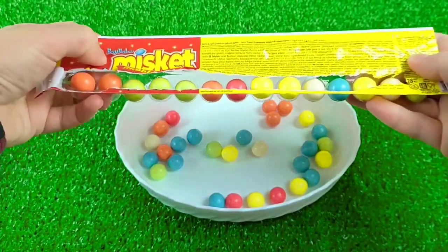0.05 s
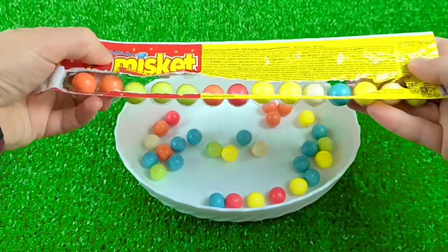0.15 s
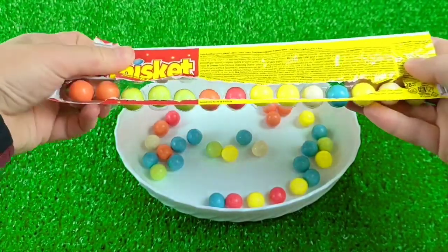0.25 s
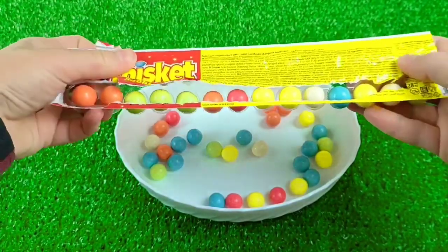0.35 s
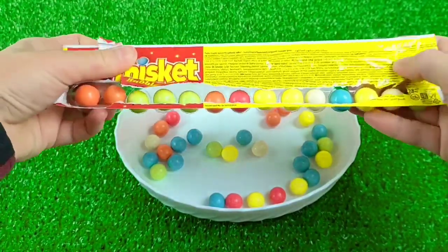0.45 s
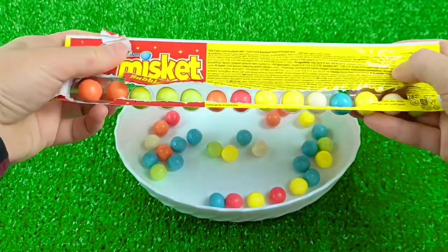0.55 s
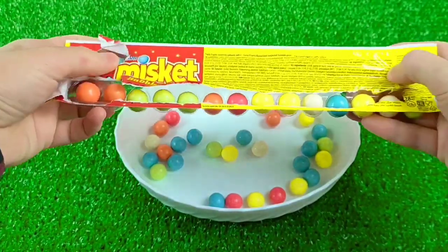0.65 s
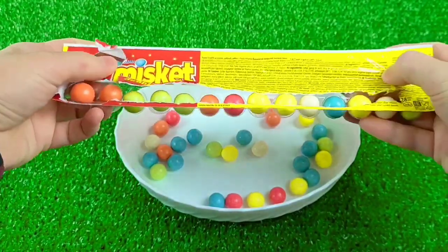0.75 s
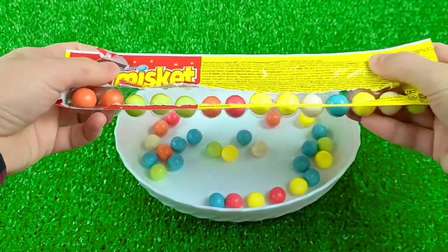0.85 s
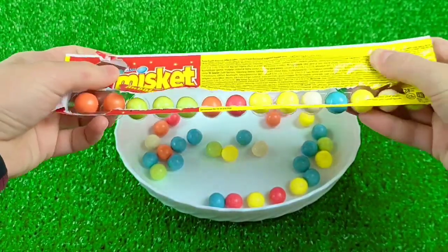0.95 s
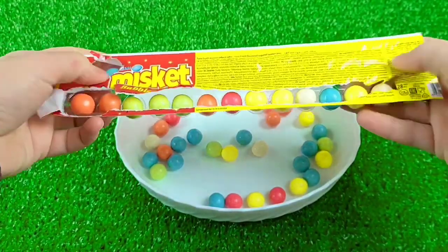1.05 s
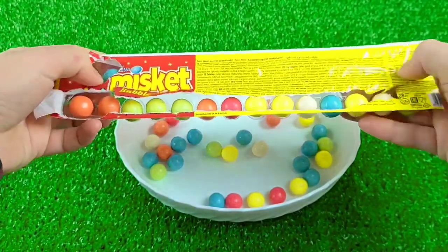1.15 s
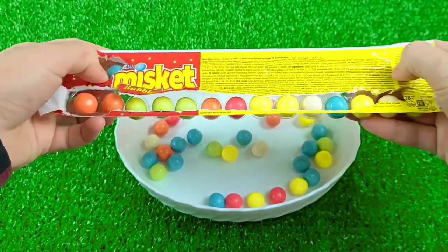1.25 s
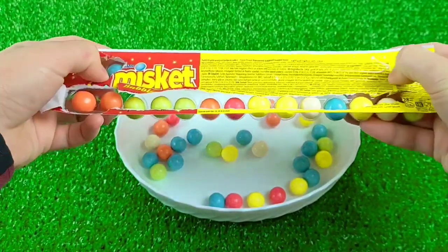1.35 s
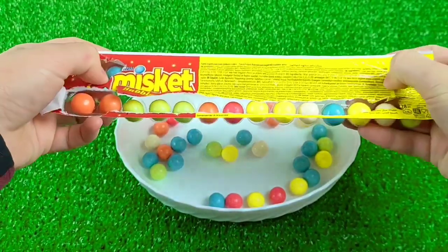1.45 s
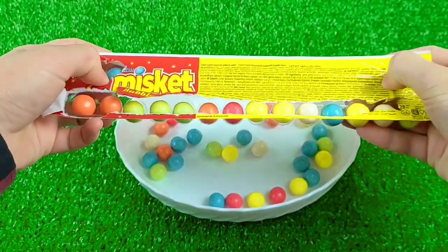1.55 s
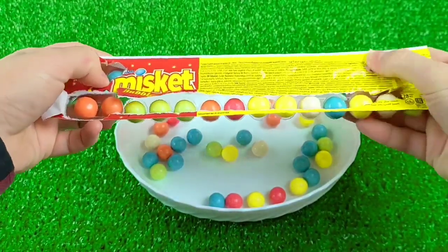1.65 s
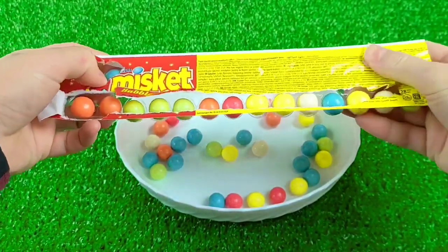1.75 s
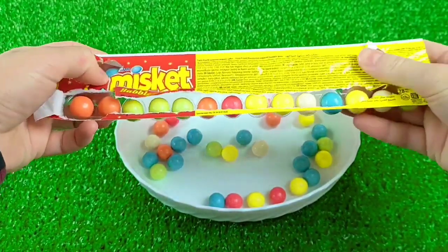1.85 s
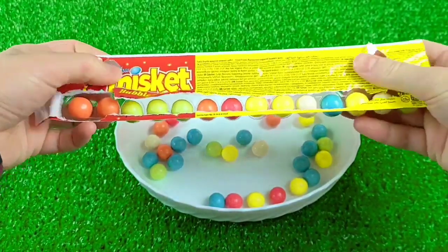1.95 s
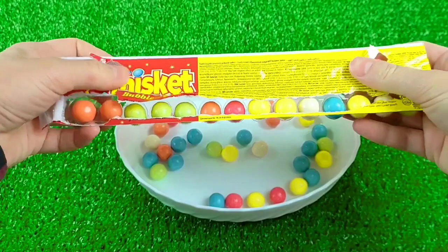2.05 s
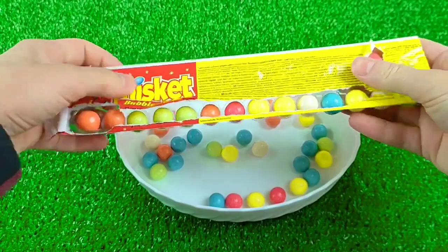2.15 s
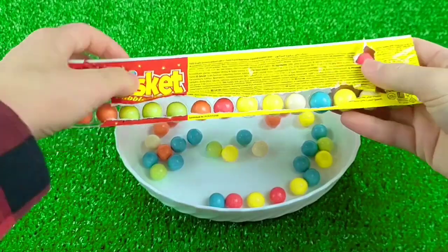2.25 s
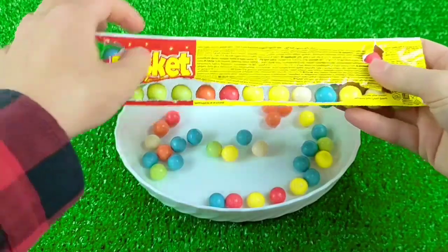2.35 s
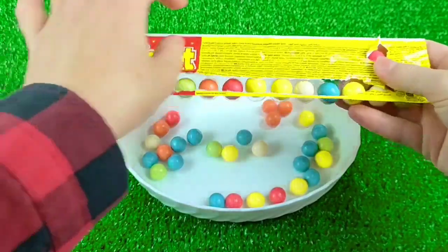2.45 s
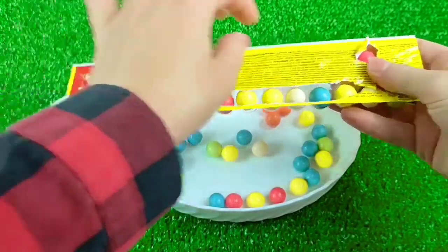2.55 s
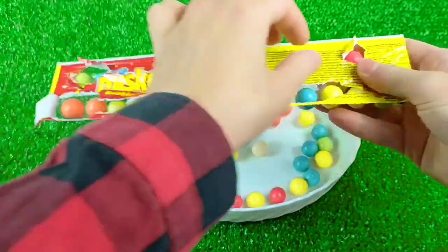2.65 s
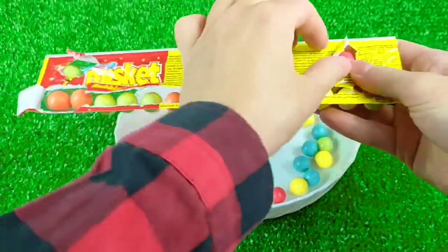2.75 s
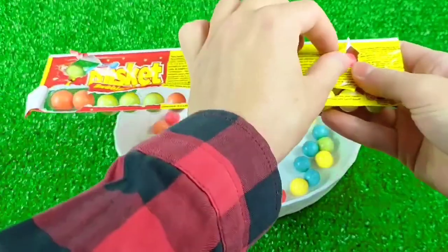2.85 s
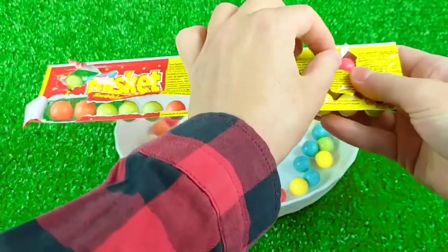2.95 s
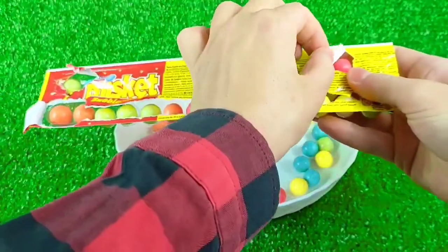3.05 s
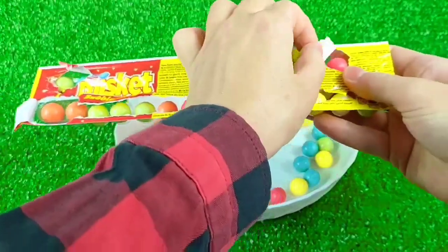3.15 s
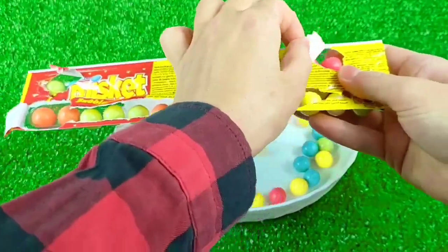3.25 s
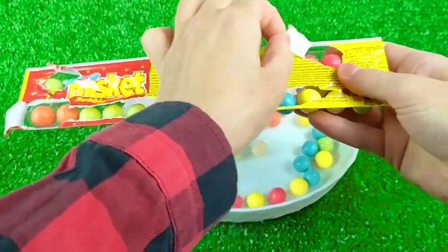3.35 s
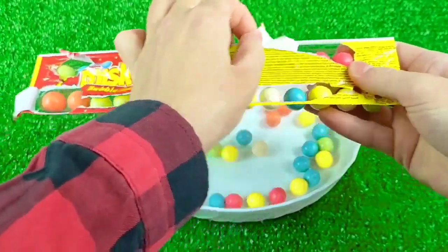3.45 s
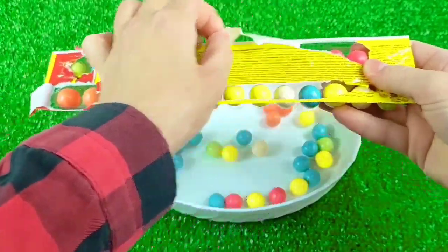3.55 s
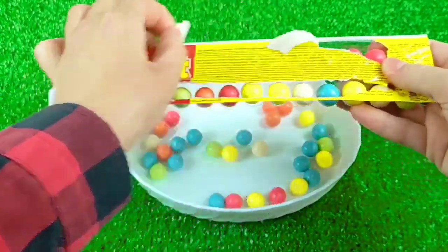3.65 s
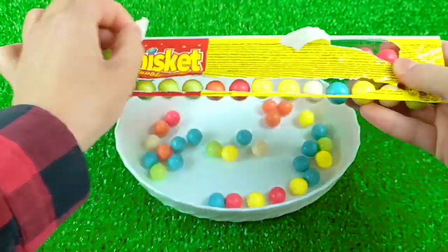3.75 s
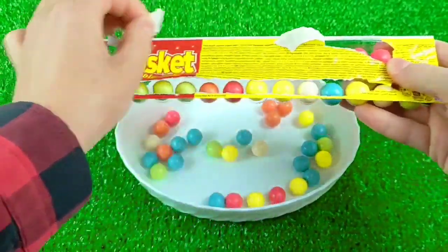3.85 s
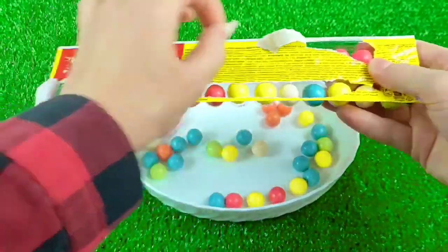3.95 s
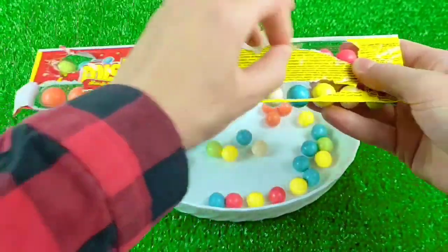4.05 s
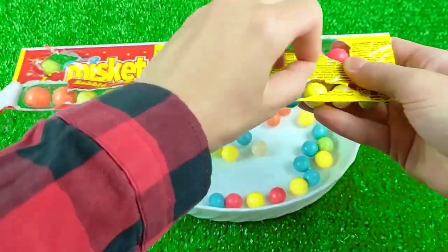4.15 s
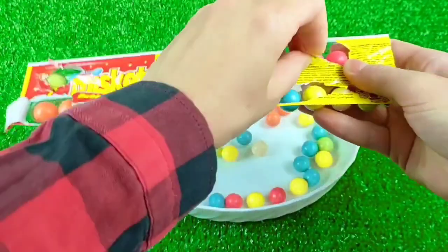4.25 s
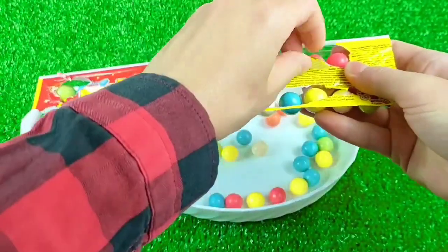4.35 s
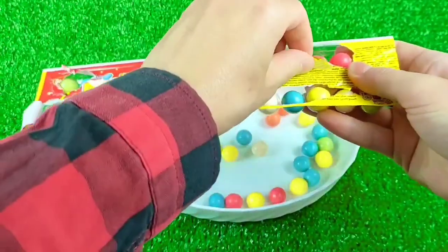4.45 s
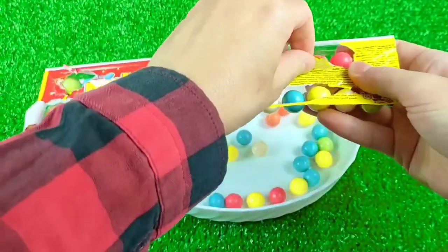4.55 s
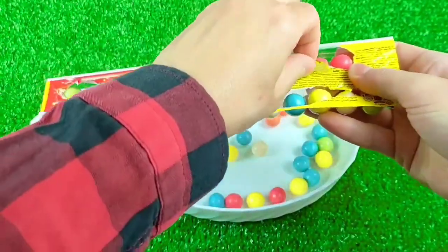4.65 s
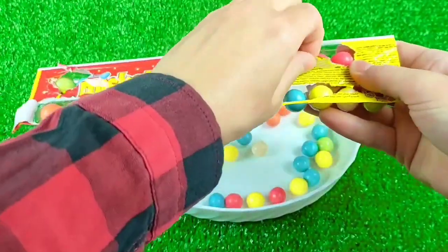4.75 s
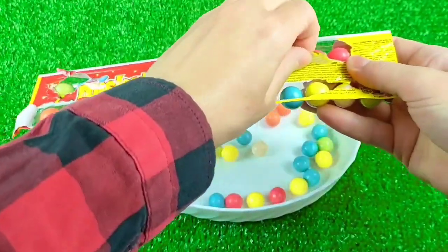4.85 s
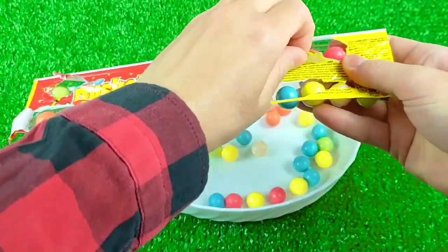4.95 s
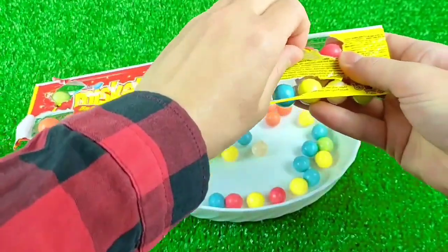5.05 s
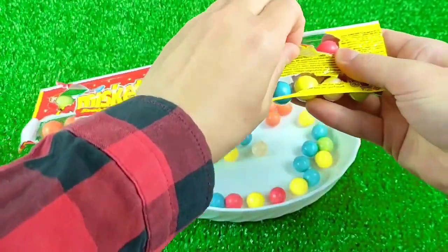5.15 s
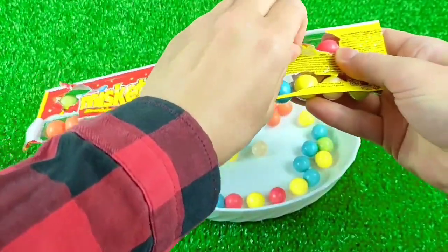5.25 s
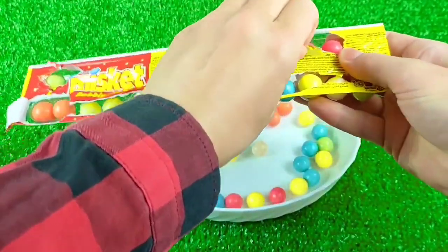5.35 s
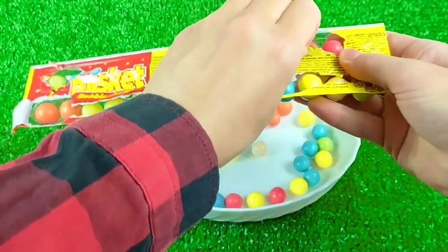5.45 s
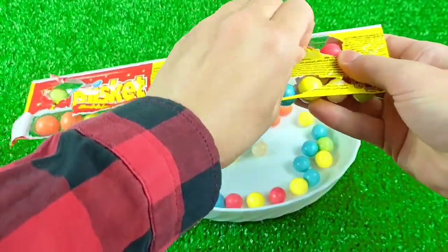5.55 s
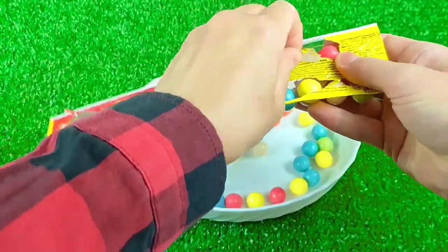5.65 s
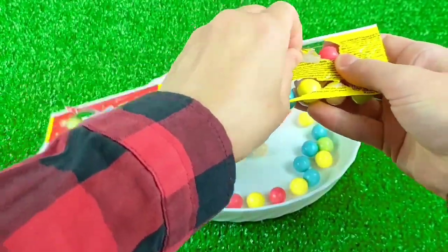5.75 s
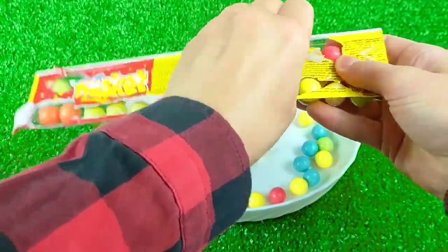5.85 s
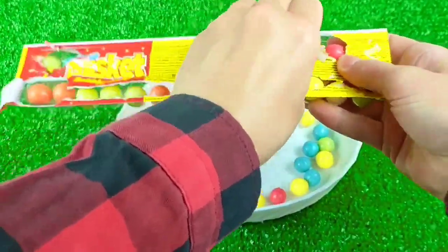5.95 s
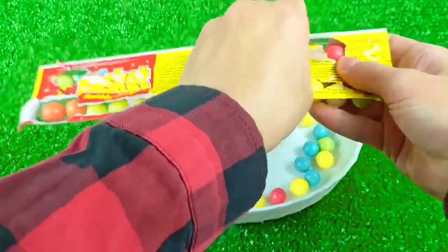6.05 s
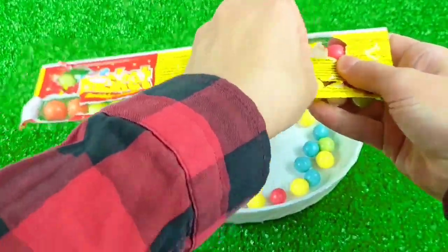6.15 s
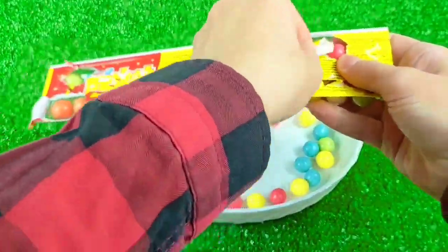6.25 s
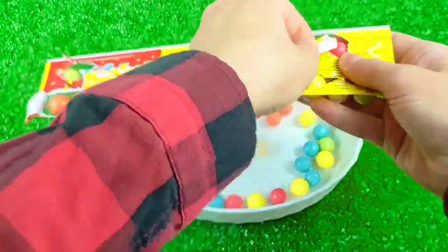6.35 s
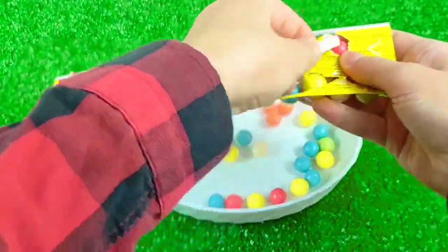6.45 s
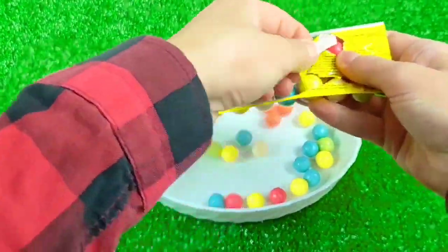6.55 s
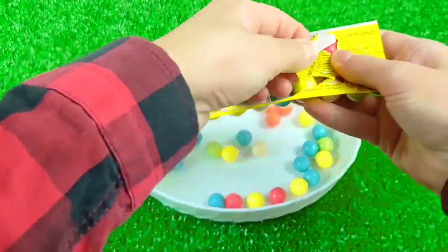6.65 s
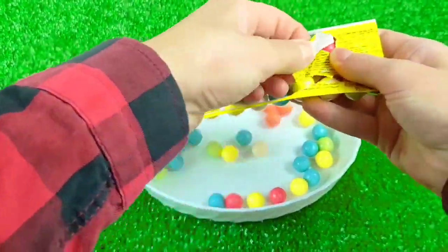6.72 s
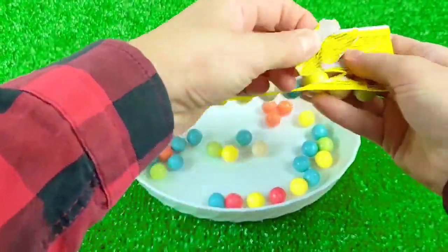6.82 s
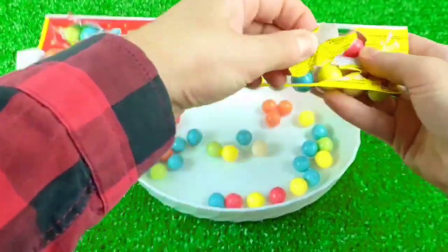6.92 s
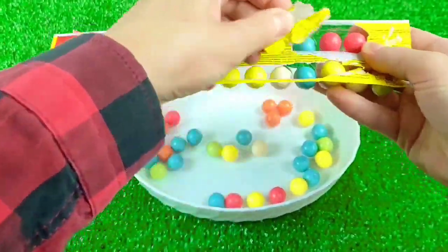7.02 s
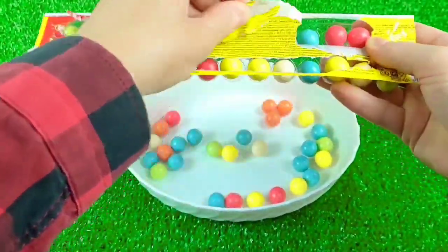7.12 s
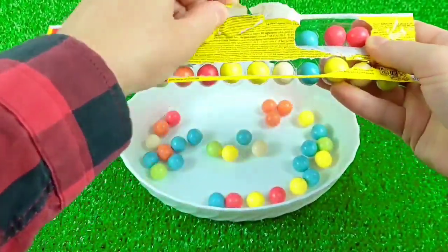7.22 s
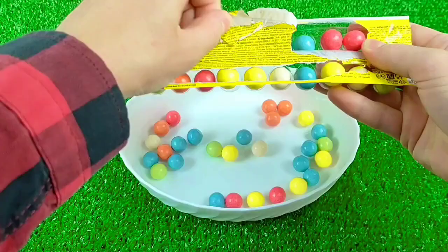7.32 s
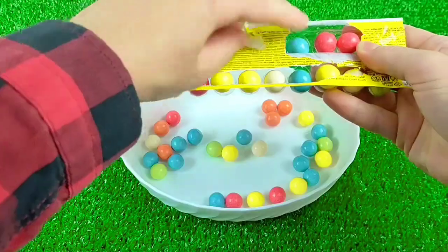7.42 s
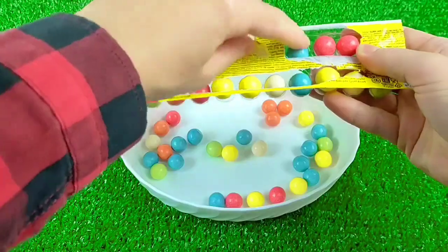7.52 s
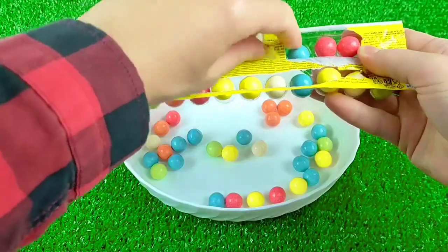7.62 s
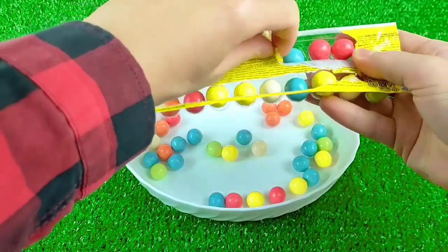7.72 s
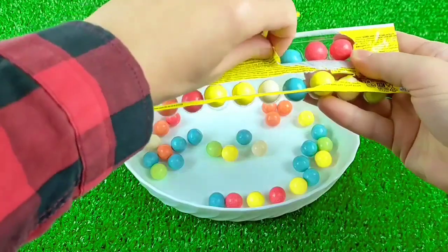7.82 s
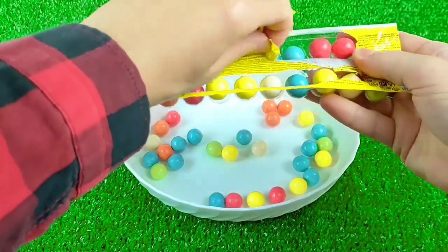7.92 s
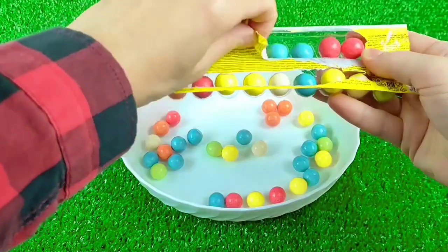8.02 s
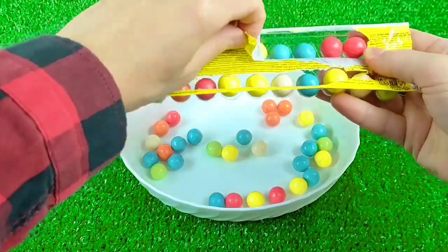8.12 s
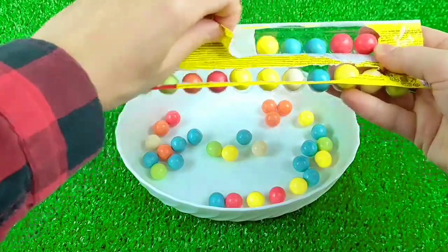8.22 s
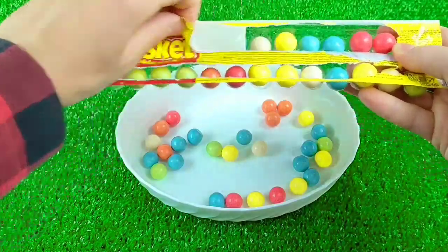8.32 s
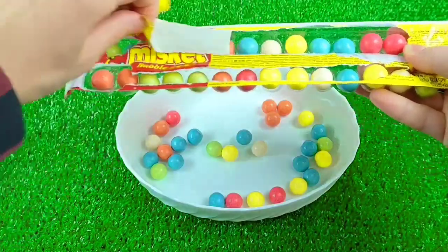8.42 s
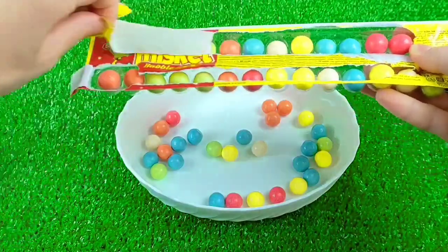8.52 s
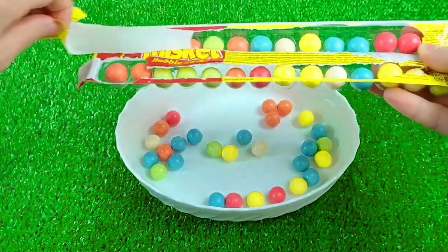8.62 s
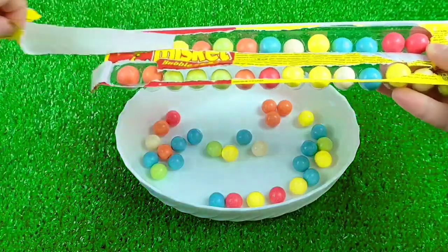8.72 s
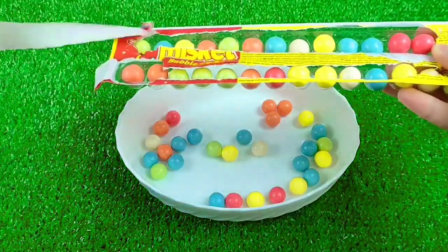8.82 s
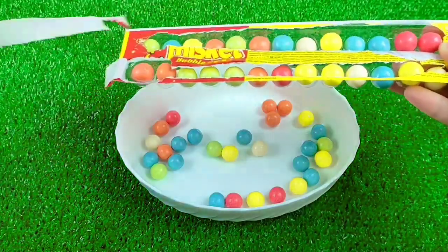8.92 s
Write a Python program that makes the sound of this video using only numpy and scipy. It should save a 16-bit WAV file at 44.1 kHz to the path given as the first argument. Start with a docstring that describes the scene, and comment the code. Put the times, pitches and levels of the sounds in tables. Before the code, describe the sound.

Bright, dry crinkling and irregular hard snaps of card and clear film, recorded close in stereo with little room sound. Quick tears and soft sleeve brushes mix in early; a drawn-out rip is followed by near quiet. Handling resumes with denser crackle, bursts loudly, and finishes with continuous paper peeling from glue over a faint hush.

```python
"""Hands flex a card-backed blister pack of candy balls; creases snap, and short pulls tear its paper
backing at 0.3 s. A faint tink follows at 0.49 s, more snaps, and longer pulls from 3.2 to 3.7 s.
After a lull, flexing and snaps thicken from 4.4 s, with a peak near 7 s; a long peel closes from 8.3 s.
Tearing and crinkling are dense ringing grains, snaps are noise bursts through facet resonances, and
sleeve brushes are shaped noise, all heard by two close ports in a small, quiet room."""
import sys
import numpy as np
from scipy import signal
from scipy.fft import rfft, irfft
from scipy.io import wavfile
from scipy.ndimage import uniform_filter1d, map_coordinates

SR = 44100
rng = np.random.default_rng(int(sys.argv[2]) if len(sys.argv) > 2 else 0)


def wav_out(sig):
    """Save sig, one row per channel (or a flat mono array), as 16-bit PCM at SR to the path in sys.argv[1]."""
    wavfile.write(sys.argv[1], SR, np.round(np.clip(np.atleast_2d(sig).T, -1, 1) * 32767).astype(np.int16))


N = 396018
TIME = np.arange(N) / SR

# colour of the pack's body: (frequency [Hz], level per Hz [dB])
PACK_COLOUR = [(120, -57), (400, -31.5), (750, -7), (1080, 2.5), (1500, -3.5), (2300, -0.5), (3300, 1),
               (4200, 3.5), (5100, 0), (6300, -2.5), (11000, -43)]
# colour of its finest, crispest crackle: (frequency [Hz], level per Hz [dB])
CRISP_COLOUR = [(1500, -50), (5000, -17), (7600, 2), (10000, 1), (13700, -3), (16000, -11)]
JERK_RATE = 45  # new courses per second, for the jerking glue and the sway of the strip's pitch


def undb(db):
    """Decibels to gain."""
    return 10 ** (np.asarray(db) / 20)


def unit(x):
    """Scale to rms 1."""
    return x / np.sqrt(np.mean(x ** 2))


def colour(x, points):
    """Causal minimum-phase filter with a spectrum of (Hz, dB) points, by way of the cepstrum."""
    hz, db = np.transpose(points)
    size = 4096
    bin_hz = np.arange(size // 2 + 1) * SR / size
    gain = undb(np.interp(np.log(bin_hz + 1), np.log(hz), db))
    cepstrum = irfft(np.log(gain))[:size // 2]
    cepstrum[0] /= 2
    response = irfft(np.exp(rfft(2 * cepstrum, size)))
    return signal.oaconvolve(x, response[None], axes=1)[:, :x.shape[1]]


def resonate(x, hz, q):
    """One resonance, gain 1 at its centre; the centre stays at or below SR / 4 and q at or above 0.6."""
    b, a = signal.iirpeak(min(hz, SR / 4), max(q, .6), fs=SR)
    return signal.lfilter(b, a, x)


def add(out, s, sound):
    """Mix a stereo sound in at time s."""
    i = int(s * SR)
    out[:, i:i + sound.shape[1]] += sound[:, :N - i]


def hiss():
    """Unrelated white noise at the two ports."""
    return rng.standard_normal((2, N))


def walk(rate):
    """Smooth chance with a spread near 1, taking a new course at the given rate a second."""
    step = int(SR / rate)
    courses = np.repeat(rng.standard_normal(N // step + 1), step)
    return uniform_filter1d(courses, step)[:N]


def stroke(s, rise_s, hold_s, fall_s):
    """Envelope of one hand movement: a straight rise, a hold and an exponential fall."""
    envelope = np.zeros(N)
    start, end = int(s * SR), int((s + rise_s + hold_s + 10 * fall_s) * SR)
    span = slice(max(start, 0), end)
    t = TIME[span] - s
    fall = np.exp(-np.maximum(t - rise_s - hold_s, 0) / fall_s)
    envelope[span] = np.clip(t / rise_s, 0, 1) * fall
    return envelope


def peeling():
    """Paper pulled off its glue: dense tearing, coarser rips of fibre clumps and a fine fibre hiss."""
    # pulls: (start [s], end [s], rise [s], fall [s], level [dB], crispness: film against card [dB])
    peels = [(0.294, 0.368, 0.038, 0.023, -17, -10.5), (0.383, 0.418, 0.039, 0.037, -17.5, -30),
             (1.78, 1.804, 0.028, 0.018, -11, -6), (3.19, 3.314, 0.12, 0.12, -23.5, -6.5),
             (3.423, 3.73, 0.12, 0.013, -17.5, -10), (6.343, 6.449, 0.067, 0.022, -23.5, -4),
             (8.053, 8.15, 0.04, 0.088, -18, -9), (8.294, 9.0, 0.036, .05, -17.5, -9.5)]
    # resonances of the taut strip: (frequency [Hz], sharpness q, mean level against the tear [dB])
    strip = [(940, 0.61, -12.5), (2560, 5, 1), (5860, 12, -14), (11700, 3.75, 15.5)]
    # colour of the finest parting fibres: (frequency [Hz], level per Hz [dB])
    fibre = [(6000, -33), (10500, -3), (14000, 10)]
    tension_db, tension_rate = 5, 9  # swell of the strip's resonances, new courses per second
    fibre_db, rip_db, jerk_db = -32, -2, 1.5  # hiss in any pull, rips against card tearing, jerk spread

    fractures = grains(rate=3600, spread_db=0.5, pitch_hz=4300, facet_db=15.0, q=31, wander_db=3.0)
    plain_tear = unit(bend(fractures))
    tear = plain_tear.copy()
    for hz, q, db in strip:
        tear += undb(db + tension_db * walk(tension_rate)) * resonate(plain_tear, hz, q)

    pulls = []
    for s, end, rise, fall, db, crisp in peels:
        pulls.append((stroke(s, rise, end - s - rise, fall), db, crisp))
    card, film = drive(pulls)
    # the fibre hiss is as loud in a gentle pull as in a hard one
    pulling = sum(envelope for envelope, _, _ in pulls)
    fibres = unit(colour(hiss(), fibre)) * undb(fibre_db) * pulling
    coarse = press(rips(), card * undb(rip_db), size=SR // 10)
    # the glue holds and lets go in quick uneven jerks
    jerks = undb(jerk_db * walk(JERK_RATE))
    return (crackle(tear, (card, film), size=1800) + coarse + fibres) * jerks


def rips(rate=200, spread_db=4.5, ring_s=0.00033, sway=0.07):
    """Fibre clumps give way at uneven steps; each plucks the taut strip, which radiates little bass."""
    # pitch of the strip's ring as the glue slips, before its sway: (time [s], pitch [Hz])
    strip_ring = [(.35, 3100), (3.3, 2750), (3.55, 3800), (3.68, 4250), (3.72, 2900), (8.9, 4250)]
    chance = rng.random((int(rate * N / SR), 4)).T
    steps = np.cumsum(.25 + chance[0])
    when = (steps / steps[-1] * (N - 1)).astype(int)
    size = undb(-spread_db * np.log(1 - .95 * chance[1]))
    force = np.zeros((2, N), complex)
    force[:, when] = size * np.exp(2j * np.pi * chance[2:])  # own chance phase at each port
    t = np.arange(int(20 * ring_s * SR)) / SR
    pluck = t * np.exp(-t / ring_s)
    ringing = signal.oaconvolve(force, pluck[None], axes=1)[:, :N]
    hz = np.interp(TIME, *np.transpose(strip_ring)) * (1 + sway * walk(JERK_RATE))
    carrier = np.exp(2j * np.pi * np.cumsum(hz) / SR)
    return np.gradient((ringing * carrier).real, axis=1)  # the slope thins out the bass


def crinkling():
    """Flexing works many small facets into fine crinkling, with small creases ticking above it."""
    # finger flexes: (start [s], length [s], crackle level [dB], crispness: film against card [dB])
    flexes = [(0.0, 0.085, -27.5, -9.5), (0.103, 0.032, -18.5, -8), (0.587, 0.098, -23, -10.5),
              (0.693, 0.073, -20.5, -5.5), (0.93, 0.093, -19, -9), (1.11, 0.1, -31, -0.5),
              (1.17, 0.19, -35, -12), (1.365, 0.056, -22, -8.5), (1.506, 0.17, -30.5, -4),
              (1.849, 0.092, -35, -8.5), (1.999, 0.22, -34, -10.5), (2.314, 0.26, -31, -5),
              (2.57, 0.077, -22.5, -34), (2.878, 0.067, -37, -13), (2.982, 0.17, -32.5, -14),
              (3.735, 0.077, -32, -11.5), (3.863, 0.21, -39.5, -16), (4.316, 0.13, -29.5, -17),
              (4.483, 0.12, -31, -14), (4.744, 0.085, -33, -8), (4.869, 0.042, -23.5, -4.5),
              (5.093, 0.078, -23, -4.5), (5.257, 0.14, -41.5, 1), (5.359, 0.079, -28.5, -13),
              (5.486, 0.083, -24, -13), (5.802, 0.033, -27.5, -12), (5.994, 0.078, -28, -13),
              (6.101, 0.36, -33.5, -13), (6.483, 0.38, -28.5, -9.5), (6.568, 0.2, -27, -5.5),
              (6.723, 0.072, -17.5, -10.5), (6.91, 0.062, -22, -12.5), (7.027, 0.084, -23.5, -35),
              (7.128, 0.08, -20.5, -22), (7.304, 0.11, -30.5, -20), (7.55, 0.35, -38.5, -10),
              (7.863, 0.14, -24.5, -5.5)]
    ticks_db = -7  # ticks against the drive of the crinkling
    gains = drive((flex(s, length), db, crisp) for s, length, db, crisp in flexes)
    crinkle = bend(grains(rate=1300, spread_db=4.0, pitch_hz=3700, facet_db=13.5, q=4.8))
    ticks = grains(rate=80, spread_db=3.0, pitch_hz=4200, facet_db=20, q=5, wander_db=2,
                   scatter_db=-15, scatter_s=0.001, count=8)
    return crackle(crinkle, gains, size=1800) + undb(ticks_db) * crackle(ticks, gains, size=SR)


def flex(s, length_s, rise_s=0.017, fall_s=0.017, settle_db=-9.5, settle_s=0.12):
    """A flex builds quickly and dies away; the creases keep settling more faintly for longer."""
    hold_s = length_s - rise_s
    settling = undb(settle_db) * stroke(s, rise_s, hold_s, settle_s)
    return np.maximum(stroke(s, rise_s, hold_s, fall_s), settling)


def grains(rate, spread_db, pitch_hz, facet_db, q, wander_db=5, wander_rate=18,
           scatter_db=-11, scatter_s=0.004, count=12):
    """Tiny fractures at random times ring small facets, which take turns as the sheet bends."""
    t = np.arange(SR // 200) / SR
    out = np.zeros((2, N))
    for facet_hz in pitch_hz * 2 ** np.linspace(-1.35, 1, count):
        when, size, sign = rng.random((int(rate * N / SR / count), 3)).T
        hits = np.sign(sign - .5) * undb(-spread_db * np.log(1 - .98 * size))
        force = np.bincount((when * N).astype(int), hits, N)
        force *= undb(wander_db * walk(wander_rate))
        # the bending wave runs through the sheet and radiates again from its edges
        sheet = undb(scatter_db) * rng.standard_normal((2, len(t))) * np.exp(-t / scatter_s)
        sheet[:, 0] = 1
        sheet += undb(facet_db) * resonate(sheet, facet_hz, q)
        out += signal.oaconvolve(force[None], sheet, axes=1)[:, :N]
    return out


def bend(x, octaves=0.07, rate=7):
    """As the sheet bends, all its resonances glide up and down together, by a varying playback speed."""
    place = np.cumsum(2 ** (octaves * walk(rate)))
    return np.array([map_coordinates(port, [place], order=2, mode="mirror") for port in x])


def drive(strokes, grip_db=-59):
    """How hard card and film are worked by (envelope, level dB, crispness dB) strokes, summed in power."""
    card, film = undb(grip_db) ** 2, 0  # between strokes the fingers still hold the pack
    for envelope, db, crisp_db in strokes:
        power = (envelope * undb(db)) ** 2
        card = card + power
        film = film + power * undb(crisp_db) ** 2
    return np.sqrt(card), np.sqrt(film)


def crackle(fractures, gains, size):
    """Fractures sound through the card and through the crisp film."""
    card, film = gains
    through_card = press(colour(fractures, PACK_COLOUR), card, size)
    return through_card + press(colour(fractures, CRISP_COLOUR), film, size)


def press(x, gain, size):
    """The hands set a crackle's mean strength over size samples; single grains still stand out."""
    power = uniform_filter1d(np.mean(x ** 2, axis=0), size=size)
    return x * gain / np.sqrt(power + power.mean() / 1000)


def snaps(q=1.7, run_s=0.0016, lead_s=0.0006, usual_db=-13, growth=0.3, jerk=0.6,
          body_db=-10, neighbour_db=-6):
    """A crease snap: a noise burst with a very short swell, a jerk and settling slips, longer if big."""
    # creases, ahead of swing and room:
    # (time [s], level over 5 ms [dB], pitch of the buckling facet [Hz], treble against facet [dB])
    creases = [(0.0621,-16,4830,2),(0.1313,-13,3200,-11),(.3155,-13,4050,-10),(.353,-7,3360,-8),(0.4515,-8.5,6200,-8),(0.5694,-20,3500,-18),
               (0.6046,-12.5,3740,-16),(0.7178,-10.5,5100,-11),
               (0.736,-16,4900,1),(0.7824,-22,4400,-4),(0.792,-14.5,4200,-6),(0.8715,-13.5,4130,-9),(1.1206,-16.5,4100,-5.5),(1.1416,-14.5,4960,-13),
               (1.217,-8,6000,-13),(1.359,-15.5,2830,-12),(1.3838,-11,2900,-27),(1.4815,-21,3030,-16),
               (1.522,-9,5070,0),(1.542,-14,5260,0),(1.589,-8.5,3750,-1.5),
               (1.6606,-13.5,2750,-4),(1.779,-20,4000,-9),(1.9003,-21.5,3860,-13),(2.04,-20,3900,-13),(2.2392,-19.5,3100,-13),(2.2905,-8,5800,-9),
               (2.3217,-13.5,3420,-8),(2.3362,-15,4640,-7),(2.4393,-16.5,2680,-9),(2.452,-12,3300,-4.5),(2.5253,-9,3460,-8),
               (2.564,-2.5,3020,-12),(2.8066,-30,4500,-9),(2.9066,-23,3800,-14),(3.0095,-14,3800,-19),
               (3.092,-17,3370,-10),(3.4068,-20.5,4300,2),(3.5001,-15,3480,-16),(3.9995,-39,4200,-25),(4.0523,-28.5,3060,-20),(4.0867,-27.5,3360,-18),(4.419,-12.5,3460,-21),
               (4.4943,-12.5,2900,-16),(4.6665,-29,4100,-4),(4.7207,-22.5,5600,4),(4.776,-17.5,5040,-2),(4.806,-17,4000,-23),(4.8517,-7,2670,-5),(4.8699,-20,2120,-13),(4.9105,-14,5260,0),
               (4.953,-19.5,3930,-14),(5.0381,-20,4800,-9),(5.101,-15.5,4430,-23),(5.1512,-8.5,4300,-6),(5.2583,-18.5,3540,-12),(5.3192,-17.5,3230,-3),
               (5.3818,-14.5,4300,-1.5),(5.5016,-12,4730,-15),(5.519,-7.5,4830,-7.5),(5.5268,-11.5,4500,-5),(5.8189,-16,3600,4.5),
               (5.876,-13.5,5060,-13),(5.9898,-19.5,3780,-12),(6.012,-8.5,3160,-13),(6.062,-14,3960,-9),(6.512,-10.5,5440,-14),(6.8616,-16,3620,-25),(6.95,-7,4660,-5),(6.9595,-2,3500,-27),
               (7.2144,-16,3600,-11),(7.314,-20.5,3710,-8),(7.3842,-21,3440,-25),(7.5525,-12.5,3180,-13),(7.5997,-11.5,4040,-11),(7.629,-18,4630,-6),(7.665,-14,4700,-3.5),(7.729,-22.5,3930,-23),
               (7.7495,-24,3000,-16),(7.7916,-18,3880,-8),(7.836,-16,3420,-8),(7.849,-16,4670,-8),(7.883,-14,3060,-16),(7.9261,-15,3000,-13),(8.023,-14,5800,-5),(8.077,-21,3700,-9)]
    out = np.zeros((2, N))
    t = np.arange(-SR // 200, SR // 50) / SR  # 5 ms before the jerk to 20 ms after
    for s, db, hz, treble_db in creases:
        size = undb(growth * (db - usual_db))
        envelope = np.exp(-np.maximum(t / run_s, -t / lead_s) / size)
        slips = rng.standard_normal((2, len(t))) * envelope
        kick = (t == 0) * jerk / size * np.linalg.norm(slips[0])
        body = colour(slips + kick, PACK_COLOUR)
        sound = unit(resonate(body, hz, q)) + undb(body_db) * unit(body)
        # a neighbouring facet of chance size gives each snap its own colour
        neighbour_hz = hz * 2 ** rng.uniform(-.8, .6)
        sound += undb(neighbour_db) * unit(resonate(body, neighbour_hz, 12))
        sound += undb(treble_db) * unit(colour(slips, CRISP_COLOUR))
        sound[1] = np.roll(sound[1], rng.integers(-5, 5))  # samples between the ports
        add(out, s + t[0], unit(sound) * undb(db) / np.sqrt(5))  # 25 ms long, levelled as over 5 ms
    return out


def jolts(decay_s=0.009, knock_s=0.002, knock_db=11):
    """The loaded pack jerks in the fingers: a dull knock and a short low thud of decaying noise."""
    # jerks of the whole pack, ahead of the room: (time [s], peak level [dB])
    jerks = [(0.355, -19), (0.738, -18), (0.872, -23), (1.590, -20), (1.803, -25), (2.29, -18),
             (2.562, -17), (4.912, -20)]
    out = np.zeros((2, N))
    t = np.arange(SR // 10) / SR
    for s, db in jerks:
        decay = np.exp(-t / decay_s) + undb(knock_db) * np.exp(-t / knock_s)
        push = rng.standard_normal((2, len(t))) * decay
        thud = colour(push, [(30, -2.0), (600, 4), (4000, -52.0)])
        add(out, s, thud / np.abs(thud).max() * undb(db))
    return out


def brushing(rise_s=0.014, fall_s=0.057, uneven_db=2.5, uneven_rate=70):
    """Sleeve and palm slide over the card: a dull noise swish that catches and slips."""
    # brushes, before the unevenness: (start [s], length [s], level [dB])
    brushes = [(0.0, 0.035, -38.5), (0.111, 0.022, -33), (0.341, 0.12, -26), (0.933, 0.053, -28.5),
               (1.228, 0.073, -38.5), (1.365, 0.041, -35.5), (1.783, 0.02, -32.5), (2.373, 0.048, -39),
               (2.55, 0.063, -23.5), (3.277, 0.17, -48.5), (3.518, 0.22, -39.5), (3.803, 0.22, -48.5),
               (4.324, 0.12, -37.5), (4.84, 0.033, -38), (5.995, 0.076, -33.5), (6.955, 0.16, -41),
               (7.043, 0.12, -35.5), (7.138, 0.037, -26), (7.327, 0.055, -35), (7.928, 0.29, -43),
               (8.105, 0.11, -38.5), (8.285, 0.98, -36.5)]
    # colour of the swish: (frequency [Hz], level per Hz [dB])
    cloth = [(80, -21), (250, -2.5), (420, 8.5), (950, -4), (1600, -16)]
    power = 0
    for s, length, db in brushes:
        power = power + (undb(db) * stroke(s, rise_s, length - rise_s, fall_s)) ** 2
    swish = unit(colour(hiss(), cloth))
    return swish * np.sqrt(power) * undb(uneven_db * walk(uneven_rate))


def tink(start_s=0.49):
    """Something hard tinks faintly: two high modes ring out briefly."""
    # modes: (frequency [Hz], starting level [dB], 60 dB decay time [s])
    modes = [(6500, -26, 0.16), (6850, -26, 0.058)]
    t = np.maximum(TIME - start_s, 0)
    return sum(undb(db - 60 * t / t60) * np.sin(2 * np.pi * hz * t) for hz, db, t60 in modes)


def swing(x, card_hz=1030, q=0.67):
    """Slack card radiates its low mids; pinched tight it sounds thin."""
    # how freely the card swings between the fingers: (time [s], low-mid emphasis [dB])
    slack = [(0.8, 1), (1.8, 7.5), (2.6, 3), (3.3, 9.5), (4.6, 6), (6.1, 3), (6.4, -2.5), (6.85, -8.5),
             (7.2, 4.5), (7.9, 5.5), (8.15, 11), (8.45, 4)]
    emphasis = undb(np.interp(TIME, *np.transpose(slack)))
    return x + (emphasis - 1) * resonate(x, card_hz, q)


def bowl(x, path_m=0.37, drift_m=0.061, drift_rate=2.5, echo_db=-9.5):
    """A bowl wall below sends each port one early reflection; its comb shifts as the hands move."""
    echo = []
    for port in x:
        delay_s = (path_m + drift_m * walk(drift_rate)) / 343  # extra path over the speed of sound
        echo.append(map_coordinates(port, [(TIME - delay_s) * SR], order=3))
    return (x + undb(echo_db) * np.array(echo)) / np.hypot(1, undb(echo_db))


def room(x, t60_s=0.22, wet_db=-15):
    """Table and near walls answer after 4 ms with a quickly dying noise tail, weakest at the top."""
    t = np.arange(SR // 2) / SR
    decay = np.exp(-np.log(1000) * t / t60_s) * (t > .004)
    tail = rng.standard_normal((2, len(t))) * decay
    tail = colour(tail, [(1000, -6.0), (4000, -1.5), (15000, -21.0)])
    tail *= undb(wet_db) / np.sqrt(np.sum(tail ** 2) / 2)
    return x + signal.oaconvolve(x, tail, axes=1)[:, :N]


def hush(level_db=-48.5):
    """The quiet room's steady bed: coloured noise, set in level ahead of the ports."""
    # colour of the hush: (frequency [Hz], level per Hz [dB])
    hush_colour = [(20, -4.5), (80, -13.5), (1000, -13.5), (15000, -38.5)]
    return unit(colour(hiss(), hush_colour)) * undb(level_db)


def ports(x):
    """Two close ports: their difference is filtered, weakest near 300 Hz and full in the low treble."""
    mid, side = (x[0] + x[1]) / 2, (x[0] - x[1]) / 2
    width = [(50, -1), (150, -7), (300, -14), (1000, -9), (2200, 1.1), (4200, 0), (8000, -4.7)]
    side = colour(side[None], width)[0]
    return np.array([mid + side, mid - side])


def scene():
    """The pack between the hands, in the room, over a faint hush."""
    pack = swing(peeling() + crinkling() + snaps() + brushing()) + jolts() + tink()
    return ports(room(bowl(pack)) + hush())


def record(dry):
    """Soft saturation rounds the highest peaks; a steep low-pass cuts the top."""
    top_hz = 15450
    rounded = dry / (1 + (dry / .95) ** 4) ** (1 / 4)
    low_pass = signal.ellip(8, .2, 70, top_hz, fs=SR, output="sos")
    return signal.sosfilt(low_pass, rounded)


dry = scene()
out = record(dry)
wav_out(out)
```